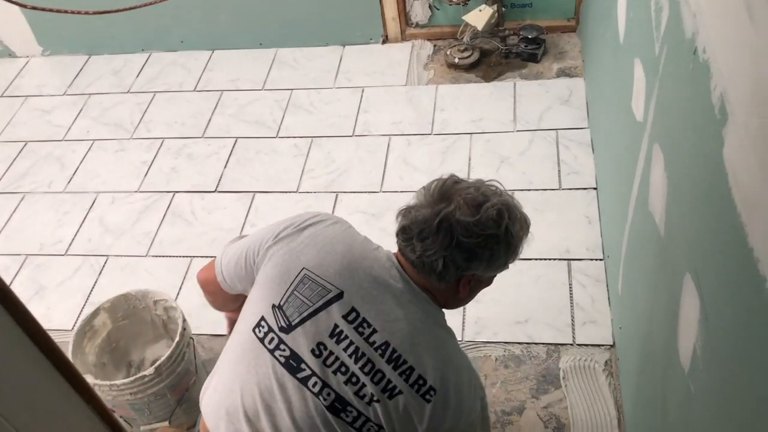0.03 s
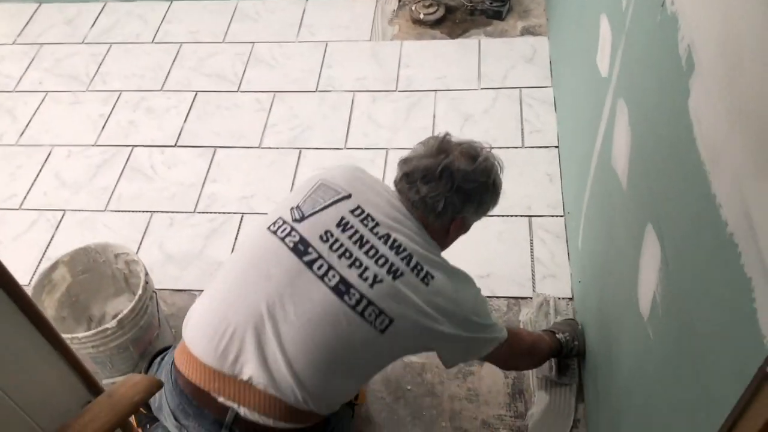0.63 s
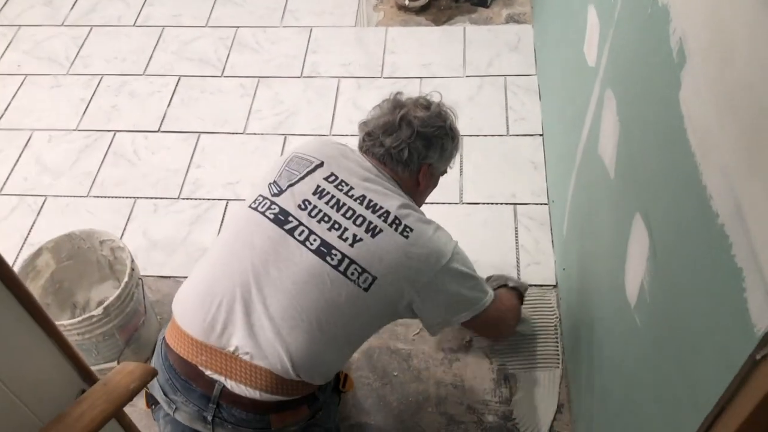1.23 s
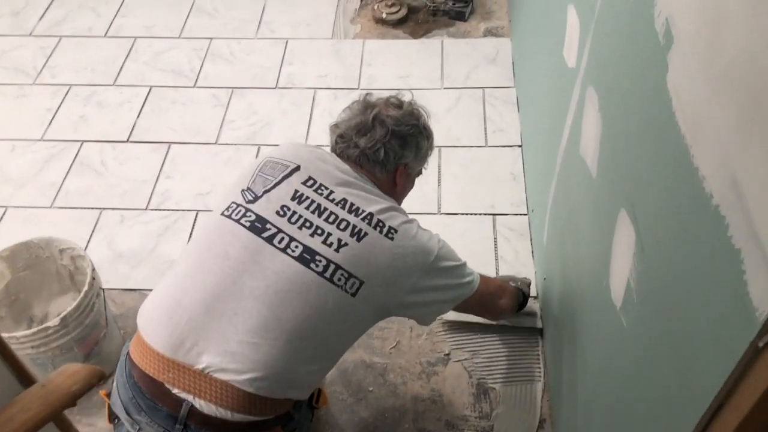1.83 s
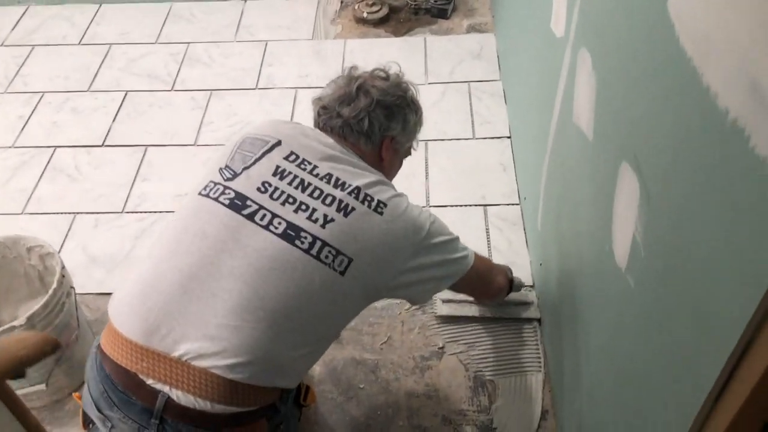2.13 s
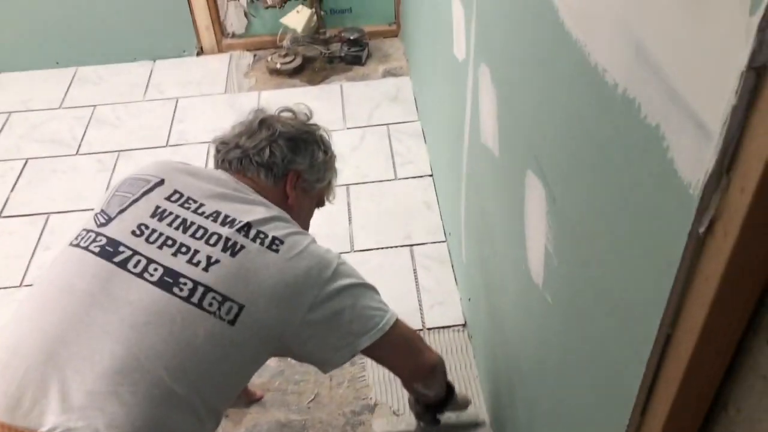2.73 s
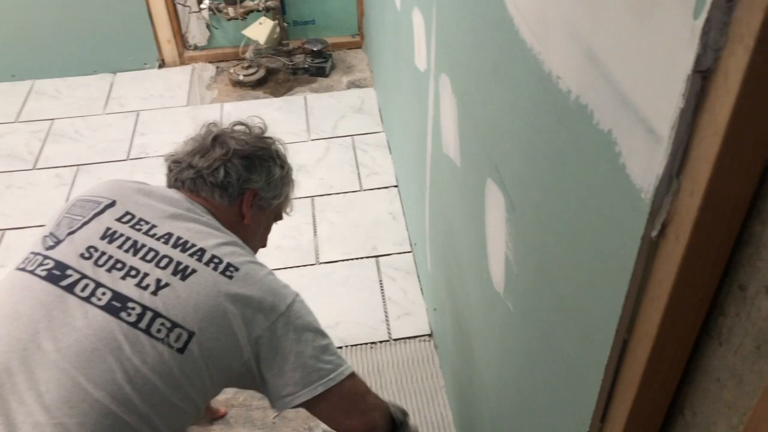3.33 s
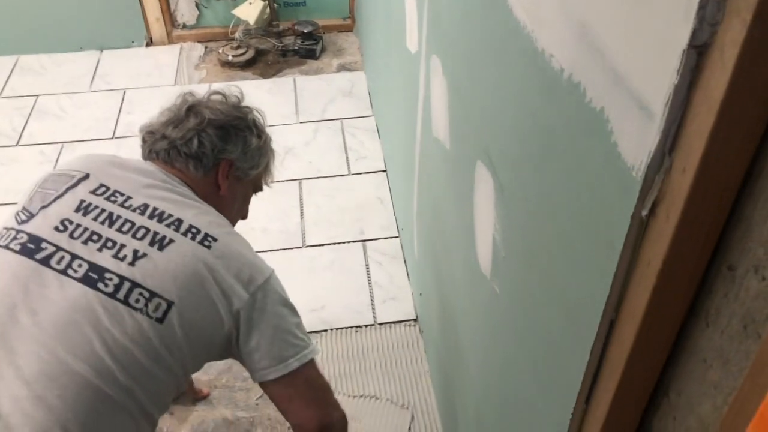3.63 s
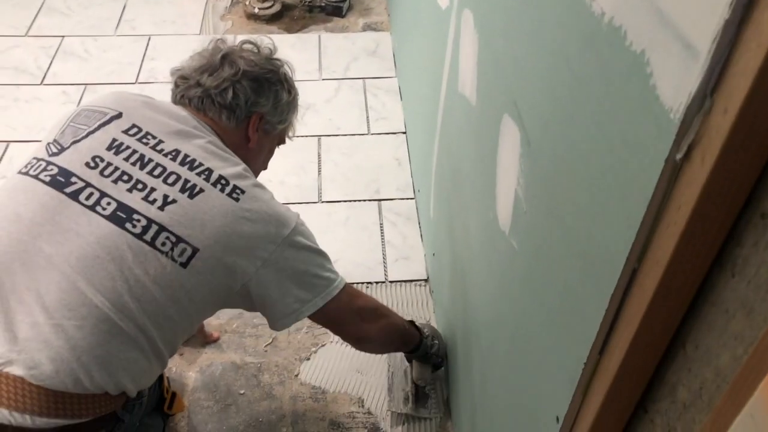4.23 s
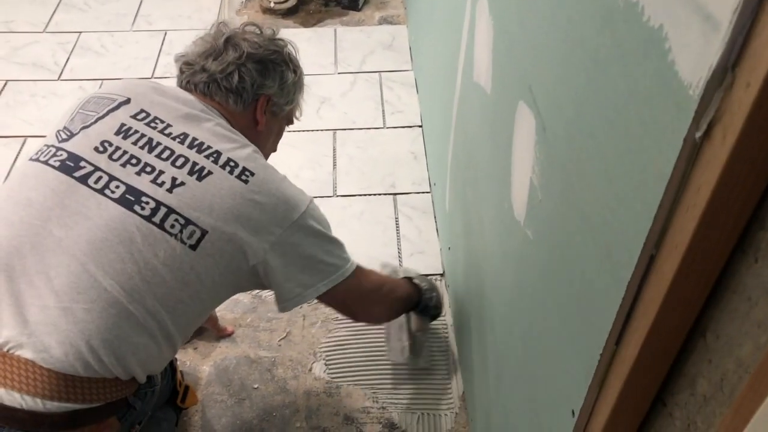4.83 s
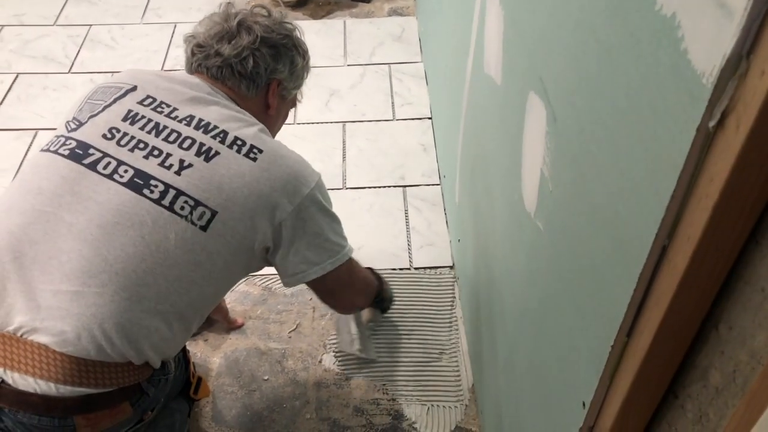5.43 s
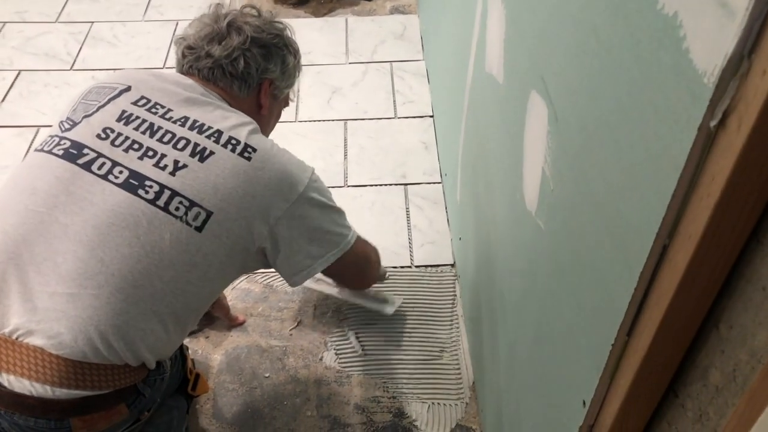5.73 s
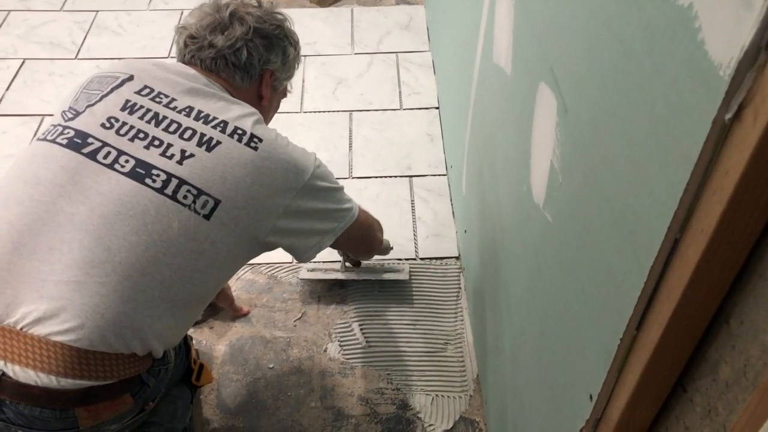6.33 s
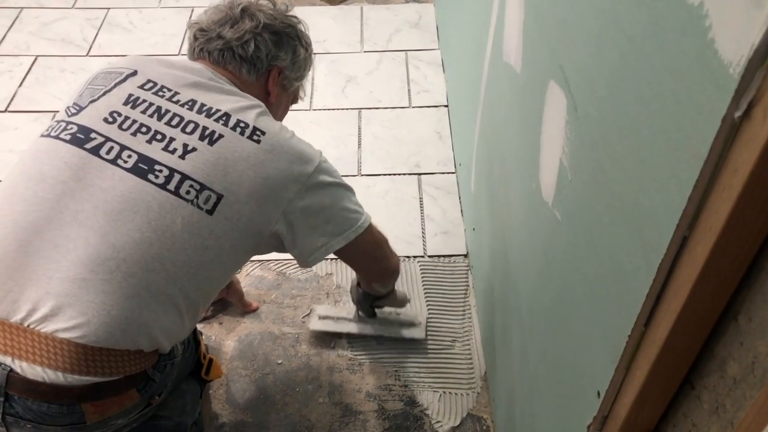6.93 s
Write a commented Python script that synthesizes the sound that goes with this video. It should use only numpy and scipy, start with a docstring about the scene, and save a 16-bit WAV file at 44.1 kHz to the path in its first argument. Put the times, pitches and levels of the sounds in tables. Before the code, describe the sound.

A notched steel trowel scrapes wet mortar over a board floor in irregular gritty strokes, with light taps between them, in a small bare room.

```python
"""Gritty scraping: a notched steel trowel wipes, scoops and combs wet tile mortar over a board floor.
Hand pressure sets each stroke's loudness, the tilt of the edge its brightness; sand grains catch under
the teeth and shake blade and floor. Now and then the blade snags or squeaks, once it slaps the mortar;
between strokes it taps and brushes the floor, and the boards thud. The room is small and bare.
A close mono microphone overloads on the hardest strokes."""
import sys
import numpy as np
from scipy import signal
from scipy.fft import rfft, irfft, next_fast_len
from scipy.io import wavfile

SR = 44100
rng = np.random.default_rng(int(sys.argv[2]) if len(sys.argv) > 2 else 0)


def file_out(sig):
    """Save sig as 16-bit WAV at sys.argv[1]."""
    # one column per channel
    cols = np.atleast_2d(sig).T
    # limit, then scale
    lim = np.clip(cols, -1, 1)
    pcm = np.round(lim * 32767).astype(np.int16)
    wavfile.write(sys.argv[1], SR, pcm)


N = 307818
TIME = np.arange(N) / SR

# hand through each stroke: (time [s], pressure as scrape level [dB], edge bite re pressure [dB])
WIPE = [(0, -24.5, -1), (0.06, -26.5, 0), (0.12, -21.5, -2), (0.22, -27.0, -2), (0.3, -29.0, 0.5),
        (0.42, -35, 0), (0.6, -35.5, -3)]
SCOOP = [(0.625, -40, 0.5), (0.69, -33.5, 6), (0.74, -18.5, -8.5), (0.785, -18.5, -2.5), (0.805, -16, 4),
         (0.865, -14.5, 1), (0.895, -10.5, -2), (0.96, -18.5, 1.5), (1.035, -18.5, 0.5)]
PUSH = [(1.06, -13, -2.5), (1.12, -11.5, 2.5), (1.17, -11, 3), (1.22, -2.5, -4), (1.25, -9.0, -6),
        (1.3, -13.5, -8)]
COMB = [(2.37, -30, -3.5), (2.5, -31.5, 0.5), (2.59, -22.5, -1.0), (2.77, -19.5, -0.5), (2.85, -20.5, 0.5),
        (2.9, -14.5, -2.0), (3.03, -15.5, -3), (3.11, -22.5, 0), (3.19, -17, 1), (3.26, -14.5, -2),
        (3.31, -9.5, -3.5), (3.35, -10.5, -11.5)]
SWIPE = [(3.785, -19.5, 10), (3.8, -12.5, 8), (3.83, -6, -7.5), (3.86, -17.5, -9)]
SPREAD = [(4.425, -23, -1.5), (4.455, -28.5, 6.5), (4.51, -12, 0.5), (4.58, -8, -2), (4.65, -10.5, 2.5),
          (4.71, -8.0, -0.5), (4.77, -10, -4.5)]
SMEAR = [(4.8, -20.5, -8.5), (4.89, -22.0, -7.5), (5.06, -17, -10), (5.27, -25, -5.5)]
PULL = [(5.29, -26.5, 0), (5.33, -21.5, -0.5), (5.48, -10.5, -5), (5.53, -9.5, -1), (5.66, -12.5, -1),
        (5.75, -12.5, -2), (5.795, -13, -9.5)]
DRAW = [(6.79, -31, 2.1), (6.84, -25, 2.2), (6.9, -22.5, 2), (6.98, -18.5, 2.9)]
# strokes: (hand table, sand hiss [dB], floor rumble [dB], rumble pitch [Hz],
# blade rasp [dB], rasp pitch [Hz], rasp width [octaves])
TROWEL_STROKES = [ (WIPE, -13, -13, 220, -11, 1370, 0.25), (SCOOP, -8.5, -12, 244, -8.5, 705, 0.54),
                  (PUSH, -4, -18.5, 250, -18, 1400, 1), (COMB, -0.41, -13.5, 192, -8.5, 1130, .18),
                  (SWIPE, -9, -17.5, 185, 1.1, 1370, 0.77), (SPREAD, -7, -24, 180, -4.5, 1214, 0.85),
                  (SMEAR, -2, -12, 186, -18, 1120, 0.21), (PULL, -3.4, -25.5, 210, -11.5, 600, 0.2),
                  (DRAW, -2, -26.5, 190, -3.5, 1120, 0.27), ]


def from_db(db):
    """Decibels to gain."""
    return 10 ** (np.asarray(db) / 20)


def unit_rms(x):
    """Scale to unit power."""
    return x / np.sqrt(np.mean(x ** 2) + 1e-20)


def at_hz(points, hz):
    """Read a table on a log-frequency axis."""
    table = np.array(points)
    return np.interp(np.log(np.maximum(hz, 1)), np.log(table[:, 0]), table[:, 1])


def band(x, low_hz, high_hz, order=2):
    """Causal band-pass."""
    edges_hz = [low_hz, np.clip(high_hz, low_hz + 1, .48 * SR)]
    return signal.sosfilt(signal.butter(order, edges_hz, "band", fs=SR, output="sos"), x + 1e-18)


def around(x, hz, octaves, order=2):
    """Band of x centred on hz; unit power."""
    return unit_rms(band(x, hz / 2 ** (octaves / 2), hz * 2 ** (octaves / 2), order))


def coloured(x, spectrum, resonances=()):
    """Give x a broad spectrum with resonances on top."""
    size = next_fast_len(N)
    hz = np.arange(size // 2 + 1) * SR / size
    lift_db = sum(db / (1 + (2 * (hz - centre) / width) ** 2) for centre, width, db in resonances)
    return irfft(rfft(x, size) * from_db(at_hz(spectrum, hz) + lift_db), size)[:N]


def drift(per_s):
    """Smooth random curve; unit power."""
    knots = rng.standard_normal(N // 20)
    return unit_rms(np.interp(TIME * per_s, np.arange(len(knots)), knots))


def ring(force, hz, t60_s):
    """One mode: a unit click starts a decaying sine of height 1."""
    radius = from_db(-60 / (t60_s * SR))
    angle = 2 * np.pi * hz / SR
    return signal.lfilter([0, np.sin(angle)], [1, -2 * radius * np.cos(angle), radius ** 2], force + 1e-18)


def add(track, start_s, sound):
    """Mix a short sound into a track."""
    start = round(start_s * SR)
    track[start:start + len(sound)] += sound[:N - start]


def grit(grains_per_s, size_spread_db, smear):
    """Sand grains crack under the teeth, over the smooth smear of the paste; unit power."""
    sizes = from_db(size_spread_db * np.minimum(rng.exponential(1, N), 5)) * rng.choice([-1, 1], N)
    chance = np.clip(grains_per_s / SR, 1e-4, 1)
    grains = unit_rms(sizes * (rng.random(N) < chance) / np.sqrt(chance))
    return unit_rms(grains + smear * rng.standard_normal(N))


def contact(hand, landing_s=0.016, lift_s=0.027):
    """Landing to lift: (sample mask, touch [0-1], pressure [dB], bite [dB])."""
    s, pressure_db, bite_db = np.transpose(hand)
    touch = np.interp(TIME, [s[0] - landing_s, s[0], s[-1], s[-1] + lift_s], [0, 1, 1, 0])
    on = touch > 0
    return on, touch[on], np.interp(TIME[on], s, pressure_db), np.interp(TIME[on], s, bite_db)


def register_gains(hiss_per_bite=1.72, brush_fade_db_per_s=25):
    """Pressure drives scrape, bite and hiss alike; a steeper edge raises the bite, the hiss still more."""
    # edge brushing the floor: (time [s], length [s], pressure [dB], bite [dB], sand hiss [dB])
    brushes = [(1.45, 0.49, -40.5, -6, -3), (1.951, 0.022, -40, -7.5, -7), (1.98, 0.042, -34.5, -2, -14),
               (2.048, 0.074, -35.5, 5, -16), (2.161, 0.15, -38.5, -3.5, -3), (2.33, 0.058, -39, 4, -10),
               (3.696, 0.074, -40, 0, -0.5), (4.384, 0.032, -37, 2.5, -9), (6.057, 0.077, -50.5, 8, -15),
               (6.131, .03, -38, 7.5, -16.5), (6.185, 0.062, -43, 3, -13), (6.623, 0.12, -38, -3, -11)]
    light_strokes = []
    for s, length_s, db, bite_db, sand_db in brushes:
        hand = [(s, db, bite_db), (s + length_s, db - brush_fade_db_per_s * length_s, bite_db)]
        light_strokes.append((hand, sand_db))
    gains = np.zeros((3, N))
    for hand, sand_db, *_ in TROWEL_STROKES + light_strokes:
        on, touch, pressure_db, bite_db = contact(hand)
        hiss_db = pressure_db + hiss_per_bite * bite_db + sand_db
        gains[:, on] += touch * from_db([pressure_db, pressure_db + bite_db, hiss_db])
    return gains


def rumble_and_rasp(scrape, rumble_octaves=1.75, rumble_per_pressure=0.75):
    """Place and grip give each stroke its own floor rumble and blade rasp; both follow the pressure."""
    out = np.zeros(N)
    teeth = grit(grains_per_s=4000, size_spread_db=0, smear=0.25)
    for hand, _, rumble_db, rumble_hz, rasp_db, rasp_hz, rasp_octaves in TROWEL_STROKES:
        on, touch, pressure_db, _ = contact(hand)
        rumble = around(scrape, rumble_hz, rumble_octaves, order=4)[on]
        rumble *= from_db(rumble_per_pressure * pressure_db + rumble_db)
        rasp = from_db(pressure_db + rasp_db) * around(teeth, rasp_hz, rasp_octaves)[on]
        out[on] += touch * (rumble + rasp)
    return out


def scraping(judder_db, judder_per_s, flutter_db, flutter_per_s):
    """Harder strokes catch more grains; stick and slip shake all registers together."""
    # scrape spectrum: (frequency [Hz], density [dB])
    spectrum = [(35, -52), (60, -13), (179, -12), (279, -7), (396, -8.5), (602, -4), (645, -2), (1000, 0),
                (1100, -1), (1330, -4), (2270, -10), (6330, -15), (9400, -13), (14000, -13.5),
                (15700, -4.5)]
    # resonances of the trowel pressed on the board: (centre [Hz], width [Hz], lift [dB])
    resonances = [(458, 26, 6), (606, 34, 4), (905, 32, 2), (1074, 22, 6), (1133, 27, 5), (1320, 250, 1.5),
                  (1487, 22, 4), (1631, 24, 5), (2050, 120, 2), (2196, 30, 3), (3233, 100, 2),
                  (3671, 30, 2)]
    # scrape, bite, hiss: (low [Hz], high [Hz], level [dB])
    registers = [(432, 1730, -2.32), (1890, 6730, -0.73), (6920, 14800, -0.97)]
    gains = register_gains()
    effort = np.sqrt(gains[0] / gains[0].max())
    force = grit(grains_per_s=900 + 7000 * effort, size_spread_db=2.0, smear=0.71)
    force *= from_db(judder_db * drift(judder_per_s))
    scrape = coloured(force, spectrum, resonances)
    out = rumble_and_rasp(scrape)
    for gain, (low_hz, high_hz, db) in zip(gains, registers):
        flutter = from_db(flutter_db * drift(flutter_per_s))
        out += gain * from_db(db) * unit_rms(band(scrape, low_hz, high_hz, order=4) * flutter)
    return out


def friction_tone(db, length_s, hz, waver_hz, t60_s):
    """Friction holds one mode at a wavering pitch, then lets it ring out."""
    t = TIME[:SR // 2]
    narrow_noise = band(rng.standard_normal(SR), hz - waver_hz / 2, hz + waver_hz / 2)
    phase = np.angle(signal.hilbert(narrow_noise)[-len(t):])
    envelope = np.minimum(t / .003, 1) * from_db(-60 * np.maximum(t - length_s, 0) / t60_s)
    return from_db(db) * envelope * np.sqrt(2) * np.cos(phase)


def boards(level_db):
    """The boards rumble as the kneeling worker shifts; once one groans faintly."""
    # rumble under the shifting weight: (time [s], level re level_db [dB])
    shifts = [(0.0, -49), (2.33, -37.5), (2.68, -55), (2.93, -34.5), (3.91, -50.5), (4.78, -40),
              (6.98, -58.5)]
    s, db = np.transpose(shifts)
    rumble = unit_rms(band(rng.standard_normal(N), low_hz=46, high_hz=101, order=3))
    out = from_db(level_db + np.interp(TIME, s, db)) * rumble
    groan = friction_tone(db=-42, length_s=0.27, hz=74, waver_hz=5.5, t60_s=0.34)
    add(out, start_s=5.82, sound=groan)
    return out


def air(level_db):
    """Steady low noise of the still room."""
    # room noise spectrum: (frequency [Hz], density [dB])
    spectrum = [(18, -44), (30, -3), (293, 5.5), (391, -0.5), (677, -7), (1270, -11), (1530, -4.5),
                (1830, -11.5), (15700, -30.5)]
    return from_db(level_db) * unit_rms(coloured(rng.standard_normal(N), spectrum))


def taps(t60_s):
    """The tool lands on grit: a short crunch, duller where mortar cushions it."""
    # tool landings: (time [s], level [dB], low edge [Hz], high edge [Hz])
    landings = [(0.407, -26, 2500, 7800), (.667, -29, 2500, 11700), (0.794, -12, 1490, 10800),
                (1.712, -18.5, 590, 6400), (2.104, -34, 2000, 9000), (2.287, -27, 2000, 11900),
                (2.363, -17, 1000, 11400), (2.521, -18, 1000, 11000), (3.045, -11, 4000, 15000),
                (3.658, -27.5, 700, 8000), (3.785, -2, 1190, 4760), (4.414, -13, 600, 8000),
                (5.129, -14, 3000, 13700), (6.518, -19.5, 557, 2350), (6.674, -30.5, 1500, 11900),
                (6.7594, -18, 1260, 6600), (6.785, -25, 1500, 14000)]
    out, t = np.zeros(N), TIME[:SR // 10]
    for s, db, low_hz, high_hz in landings:
        crunch = unit_rms(band(rng.standard_normal(len(t)), low_hz, high_hz))
        add(out, s, crunch * from_db(db - 60 * t / t60_s))
    return out


def thuds(reach_octaves):
    """Weight lands on the boards; where and how softly decides which modes answer."""
    # board floor modes: (frequency [Hz], gain [dB], t60 [s])
    floor_modes = [(81.5, -4.5, 0.35), (112, 13.5, 0.071), (124.7, 5.5, 0.37), (171, 8, 0.5),
                   (198, 12.5, 0.23), (234, 2, 0.3), (253.7, 7.5, 0.33), (305, -3.5, 1), (347, 4.5, 0.37),
                   (461, 9.5, 0.17)]
    # blows on the floor: (time [s], level [dB], centre of the response [Hz])
    blows = [(.53, -35, 85), (0.863, -29.5, 238), (.925, -23, 71), (1.056, -31.5, 86), (1.714, -31, 282),
             (1.788, -36, 195), (1.954, -12, 65.5), (2.04, -38, 297.5), (2.213, -33.5, 93),
             (2.748, -26.5, 139), (3.839, -39, 154), (4.383, -41.5, 160), (4.7, -31, 148),
             (5.205, -20.5, 290), (5.223, -27, 130), (5.26, -24, 139)]
    out = np.zeros(N)
    for k, (hz, mode_db, t60_s) in enumerate(floor_modes):
        force = np.zeros(N)
        for s, db, centre_hz in blows:
            share = np.exp(-(np.log2(hz / centre_hz) / reach_octaves) ** 2)
            add(force, s, from_db([db + mode_db]) * share)
        out += (-1) ** k * ring(force, hz, t60_s)
    return out


def snags(uneven_db):
    """A snag plucks the blade; each mode takes a random share of the blow."""
    # free steel blade modes: (frequency [Hz], gain [dB], t60 [s])
    blade_modes = [(2196, -1, .12), (2590, -5, .12), (3278, -6, .15), (3805, -4, .2), (4301, -6, .18),
                   (4732, -4, .2), (5507, -7, .18), (5959, -2, .2), (6939, -9, .14), (7620, 0, .16),
                   (7855, -2, .16), (8950, -2, .16), (11020, -9, .12)]
    # plucks of the blade: (time [s], level [dB])
    plucks = [(.796, -12.5), (0.89, -15.5), (1.713, -53), (2.362, -42)]
    out = np.zeros(N)
    for hz, mode_db, t60_s in blade_modes:
        force = np.zeros(N)
        for s, db in plucks:
            add(force, s, from_db([db + mode_db + uneven_db * rng.normal()]) * rng.choice([-1, 1]))
        out += ring(force, hz, t60_s)
    return out


def squeaks(t60_waver_cycles):
    """The steel edge sings briefly on bare floor; the purer the tone, the longer it rings on."""
    # blade squeaks: (time [s], level [dB], length [s], pitch [Hz], waver [Hz])
    tones = [(0.821, -16, 0.027, 3340, 120), (0.883, -16.5, .052, 3800, 65), (0.919, -19, 0.017, 2440, 90),
             (1.04, -24, 0.046, 2600, 70), (1.242, -11.5, 0.017, 3380, 39.7), (1.277, -18, .012, 3366, 91),
             (1.333, -21.5, 0.012, 3358, 36.2), (2.604, -28, 0.21, 3000, 650),
             (4.372, -39, 0.039, 3360, 330), (6.057, -44, 0.05, 3170, 150), (6.13, -35, 0.11, 2600, 1400),
             (6.14, -41.5, 0.13, 1530, 170), (6.867, -25.5, 0.12, 2930, 298)]
    out = np.zeros(N)
    for s, db, length_s, hz, waver_hz in tones:
        add(out, s, friction_tone(db, length_s, hz, waver_hz, t60_s=t60_waver_cycles / waver_hz))
    return out


def slap(start_s, level_db, hz, t60_s, rise_hz, rise_s):
    """The flat blade slaps the mortar; the pocket under it rings hollow, rising in pitch as it closes."""
    out, t = np.zeros(N), TIME[:SR // 2]
    hollow = signal.hilbert(around(rng.standard_normal(len(t)), hz, octaves=0.47))
    below_hz = rise_hz * np.exp(-t / rise_s)
    rising = np.real(hollow * np.exp(-2j * np.pi * np.cumsum(below_hz) / SR))
    add(out, start_s, rising * from_db(level_db - 60 * t / t60_s))
    return out


def room(x, early_db, early_t60_s, late_db):
    """Close walls return echoes that change as the trowel moves, then a tail whose treble dies first."""
    # reverberation: (frequency [Hz], t60 [s])
    decay_times = [(100, 1), (500, 0.94), (1000, 0.83), (1500, 0.95), (2300, 0.75), (3700, 0.66),
                   (9700, 0.4), (16000, 0.07)]
    t = TIME[:SR]
    edges_hz = np.geomspace(60, 18000, 13)
    tail = np.zeros(SR)
    for low_hz, high_hz in zip(edges_hz, edges_hz[1:]):
        t60_s = at_hz(decay_times, np.sqrt(low_hz * high_hz))
        tail += band(rng.standard_normal(SR), low_hz, high_hz) * from_db(-60 * t / t60_s)
    late = signal.fftconvolve(x, tail / np.linalg.norm(tail))[:N]
    early, block = np.zeros(N), SR // 8
    fade = from_db(-60 * t[:block] / early_t60_s) * (t[:block] > .003)
    for start in range(0, N, block):
        echoes = rng.standard_normal(block) * fade
        add(early, start / SR, signal.fftconvolve(x[start:start + block], echoes / np.linalg.norm(echoes)))
    shares = from_db([0, early_db, late_db])
    return shares @ [x, early, late] / np.linalg.norm(shares)


def scene():
    """Reverberant trowel over floor and room noise, the same in both channels."""
    trowel = scraping(judder_db=0.78, judder_per_s=180, flutter_db=1.62, flutter_per_s=45)
    trowel += snags(uneven_db=4.0)
    trowel += squeaks(t60_waver_cycles=11.6)
    trowel += slap(start_s=6.518, level_db=-25.5, hz=1045, t60_s=0.5, rise_hz=380, rise_s=0.03)
    trowel += taps(t60_s=0.04)
    floor = thuds(reach_octaves=0.54) + boards(level_db=-3.5)
    mono = floor + air(level_db=-44) + room(trowel, early_db=-8.0, early_t60_s=0.27, late_db=-11.5)
    return np.array([mono, mono])


def record(dry):
    """Overload flattens the loudest peaks; a steep low-pass cuts the top."""
    ceiling, cutoff_hz = 1.02, 15750
    flattened = dry / (1 + (dry / ceiling) ** 8) ** (1 / 8)
    return signal.sosfilt(signal.ellip(12, .1, 80, cutoff_hz, fs=SR, output="sos"), flattened)


dry = scene()
out = record(dry)
file_out(out)
```